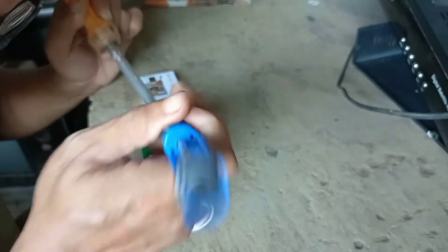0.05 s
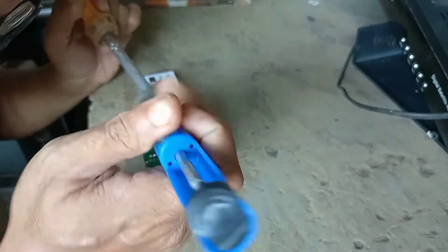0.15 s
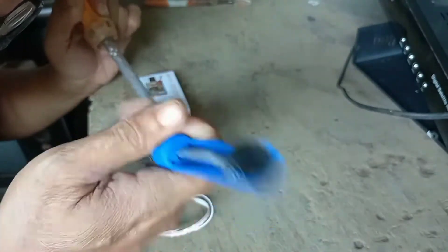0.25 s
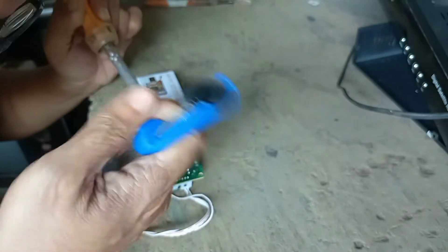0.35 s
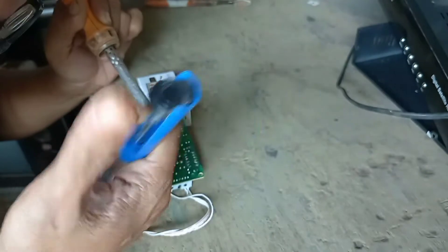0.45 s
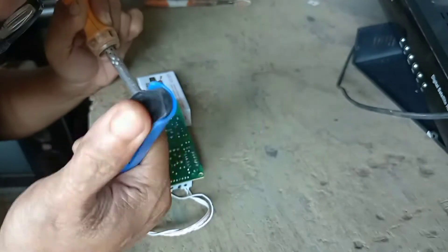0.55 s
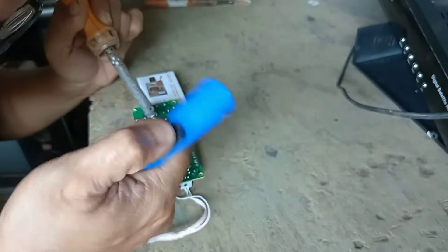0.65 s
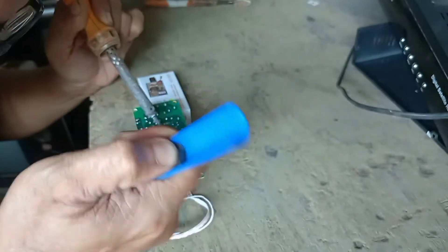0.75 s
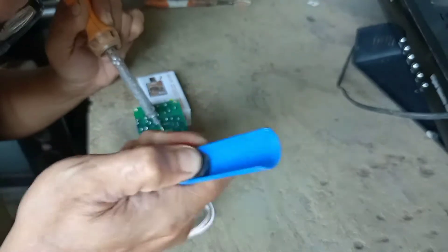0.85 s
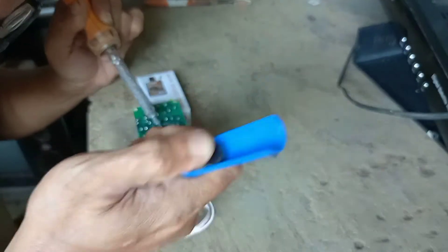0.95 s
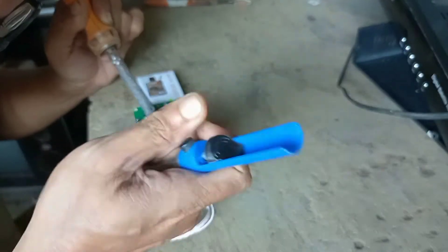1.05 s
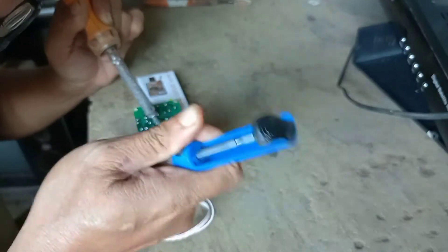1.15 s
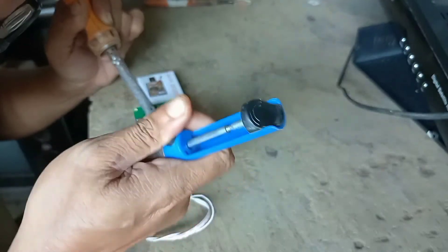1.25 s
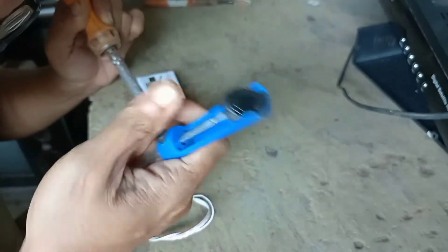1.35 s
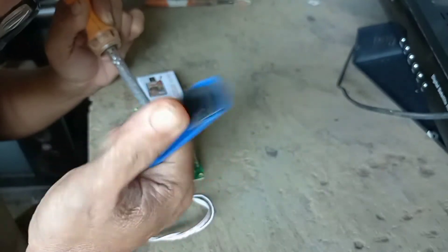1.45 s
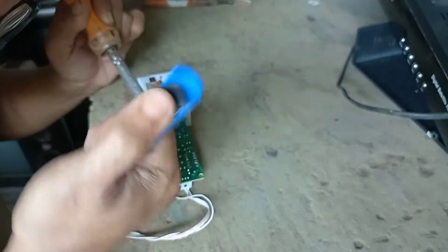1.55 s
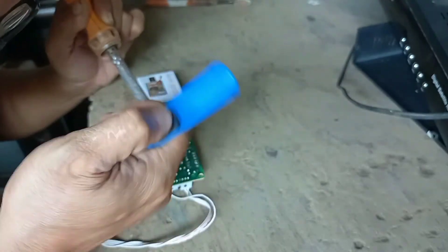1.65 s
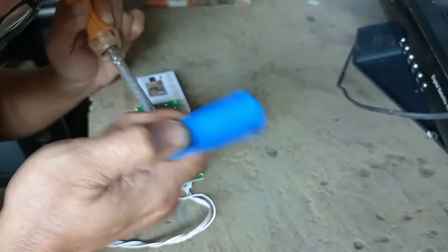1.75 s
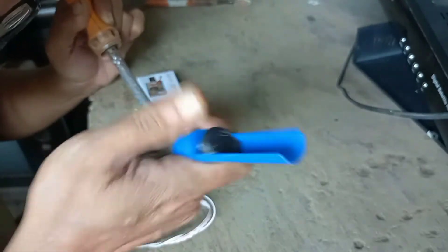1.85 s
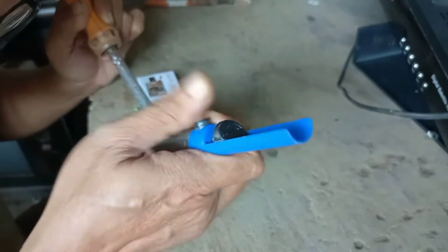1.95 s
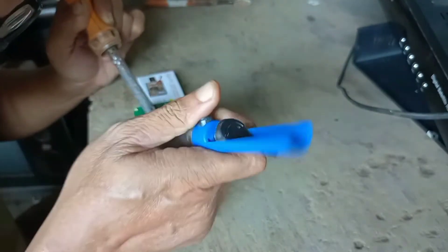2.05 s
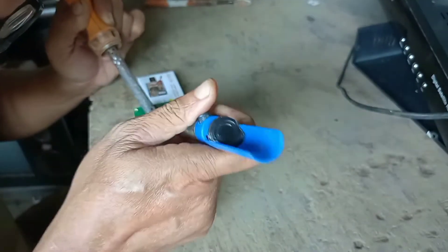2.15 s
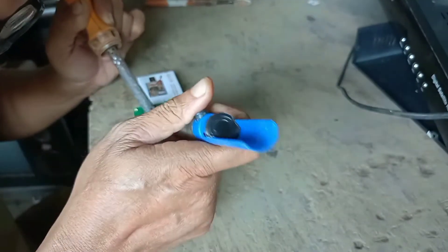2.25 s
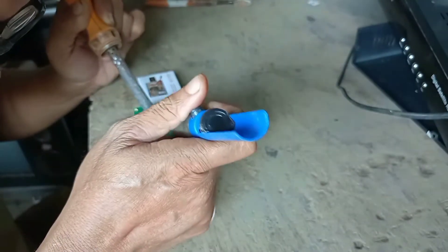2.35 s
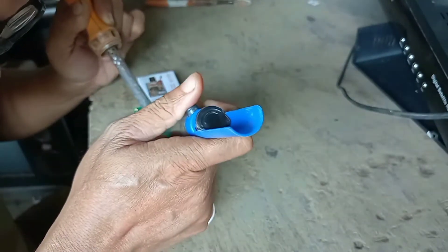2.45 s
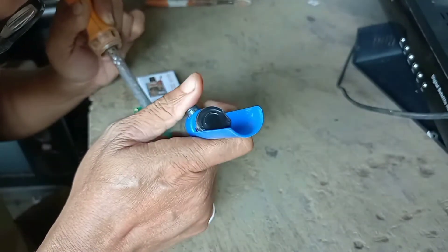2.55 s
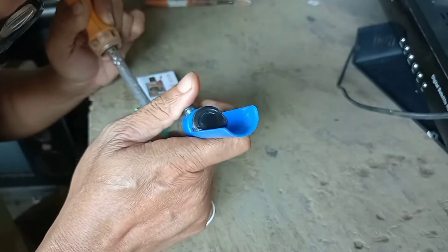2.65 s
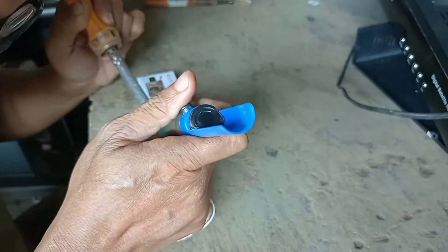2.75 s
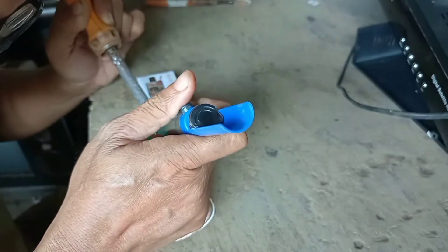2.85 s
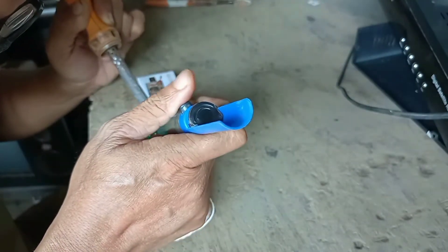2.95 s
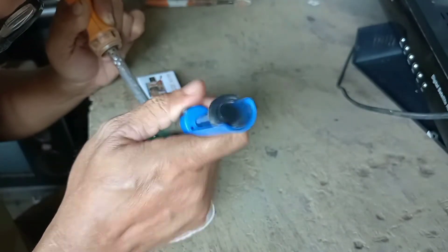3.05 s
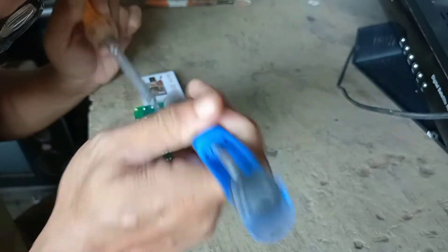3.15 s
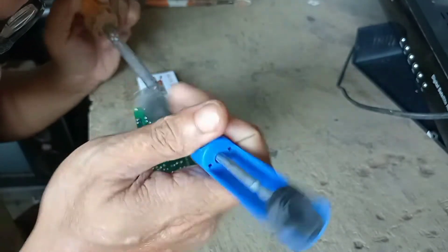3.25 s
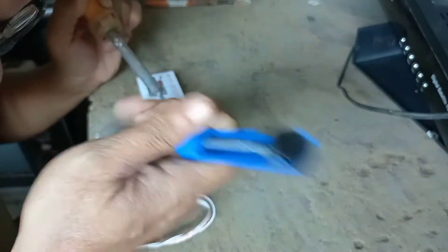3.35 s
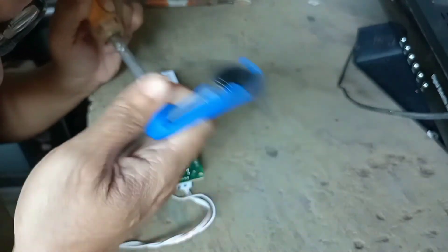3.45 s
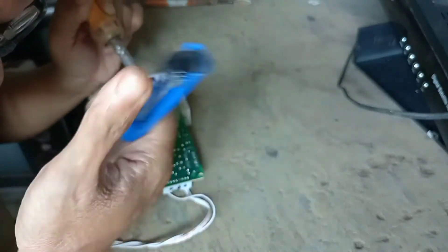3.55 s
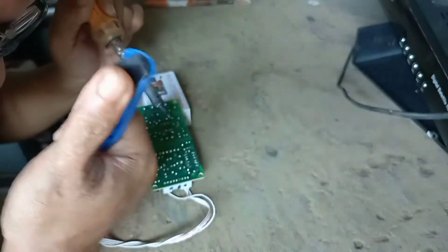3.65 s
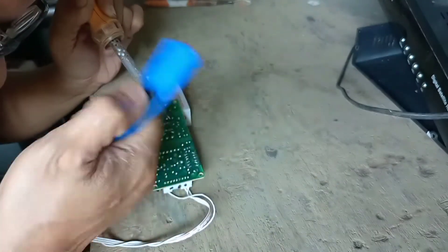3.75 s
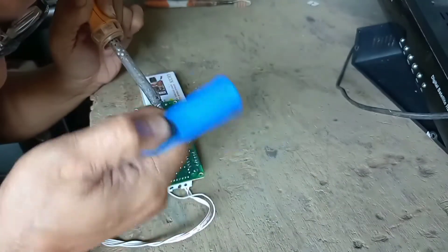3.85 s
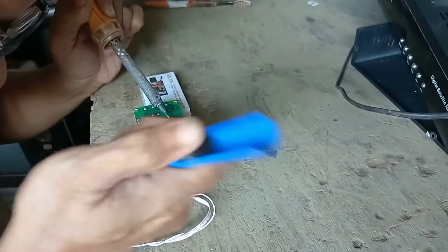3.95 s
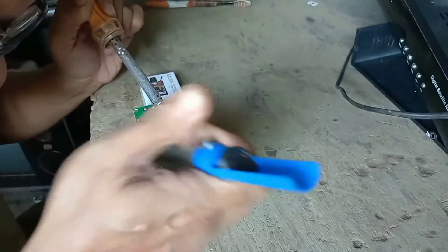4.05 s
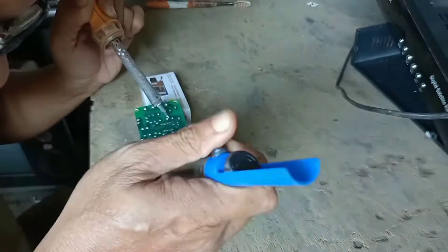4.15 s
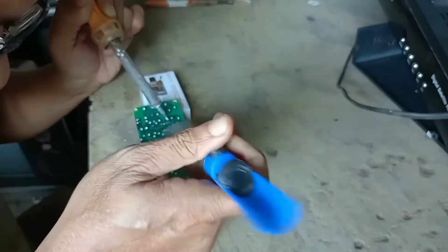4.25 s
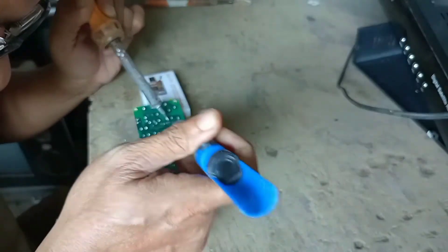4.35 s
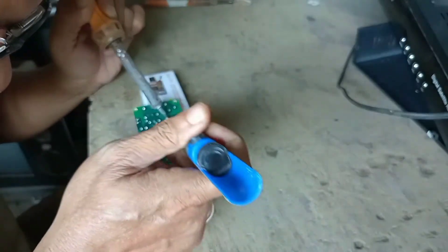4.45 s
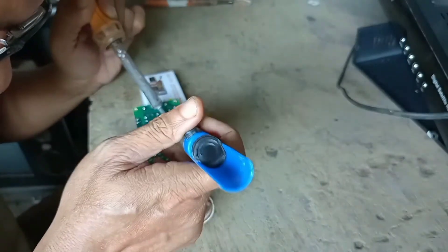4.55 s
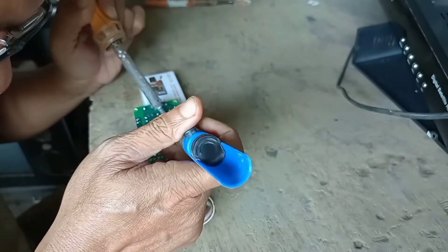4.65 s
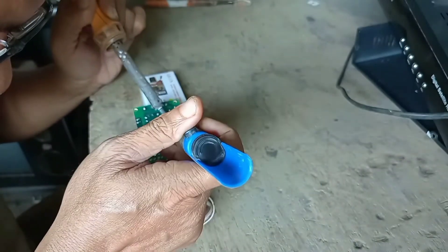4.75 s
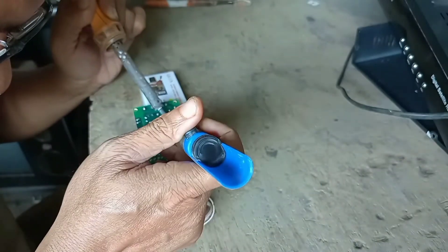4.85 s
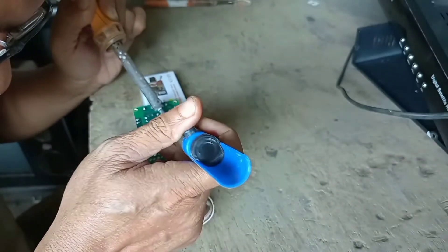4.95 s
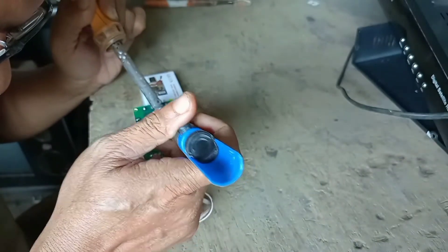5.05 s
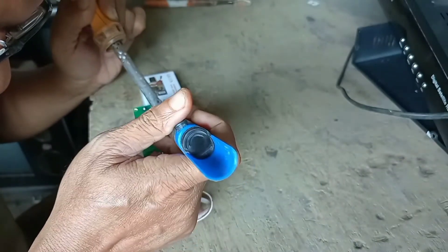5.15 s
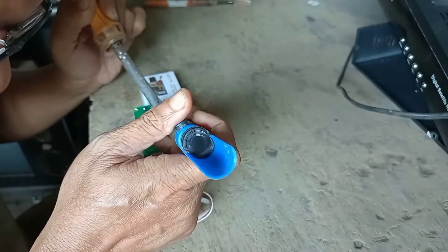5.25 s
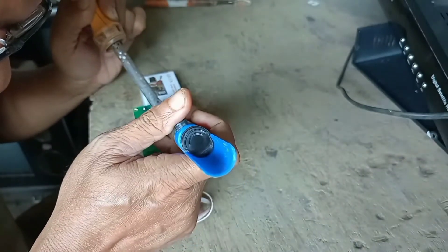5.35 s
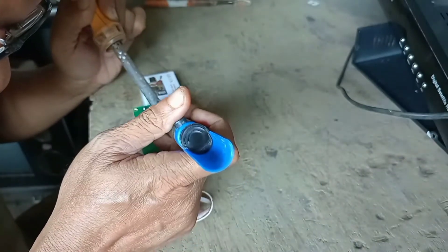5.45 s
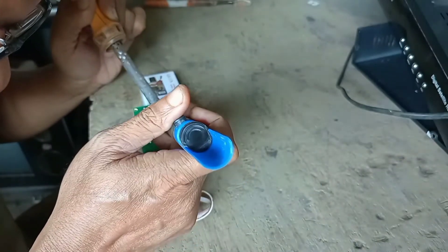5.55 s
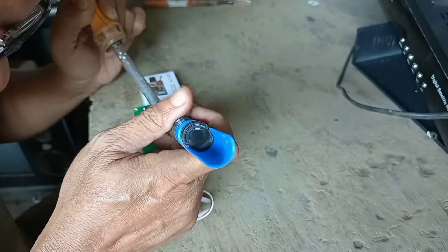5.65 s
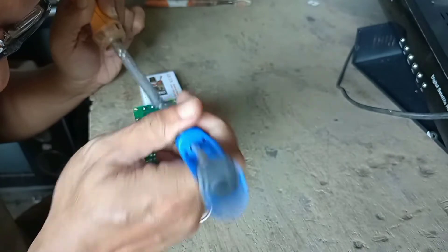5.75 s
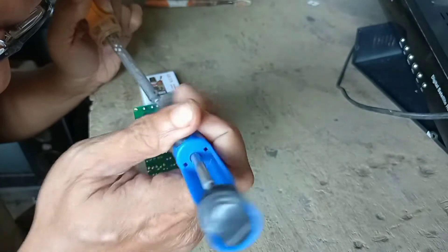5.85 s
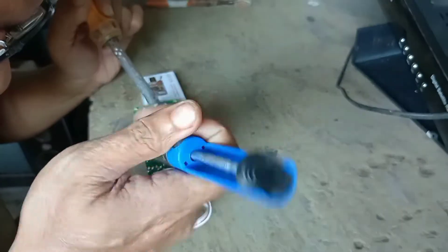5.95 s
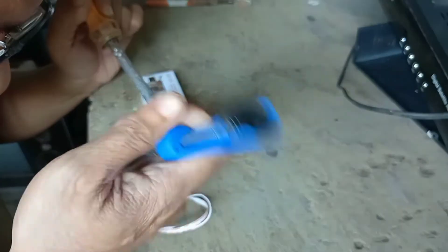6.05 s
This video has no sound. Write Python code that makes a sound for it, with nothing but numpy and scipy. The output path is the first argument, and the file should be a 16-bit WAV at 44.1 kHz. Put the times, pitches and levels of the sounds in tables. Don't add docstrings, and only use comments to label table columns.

```python
import sys
import numpy as np
from scipy import signal
from scipy.fft import rfft, irfft
from scipy.io import wavfile
from scipy.ndimage import uniform_filter1d

SR = 44100
rng = np.random.default_rng(int(sys.argv[2]) if len(sys.argv) > 2 else 0)


def magnitude_from_level(level_db):
    exponent = np.asarray(level_db, float) / 20
    return 10 ** exponent


def wav_out(sig):
    wavfile.write(sys.argv[1], SR, np.round(np.clip(np.atleast_2d(sig).T, -1, 1) * 32767).astype(np.int16))


N = 269451
T = np.arange(N) / SR

# (time [s], peak [dB], limiter dip [dB], air [dB], barrel ring [dB])
RELEASES = [
    (0.0215, -4, 10.5, -32, 0),
    (1.1733, -3.5, 13, -32, 0.5),
    (3.0720, -5, 12.5, -27, 1),
    (5.7270, -6, 14.5, -31.5, -2),
]
# (thumb push [s], latch catch [s], latch peak [dB], barrel ring [dB])
COCKS = [
    (0.595, .69, -4.5, 1.5),
    (1.572, 1.6589, -4, 2),
    (3.711, 3.7926, -2.5, -0.5),
]
# (pop time [s], pop peak [dB], air jet [dB])
SEATS = [
    (0.9822, -11.5, -26),
    (1.8396, -9.5, -27),
    (3.9853, -12, -21.5),
]
# (pitch [Hz], width [Hz], level [dB])
LATCH_MODES = [(3340, 750, 1), (4840, 530, -5.5), (5370, 390, -12), (7000, 290, -3), (9300, 1600, -3.5),
               (14800, 900, -14)]

TRAVEL_S = .0127
LATCH_EDGE_HZ = 2750
PORT_LAG_S = .00015


def unit(x):
    return x / np.sqrt(np.mean(x ** 2))


def on_log(table, hz):
    point_hz, value = np.transpose(table)
    return np.interp(np.log(hz + 1), np.log(point_hz + 1), value)


def colour(x, table):
    size = x.shape[-1]
    gain = magnitude_from_level(on_log(table, np.fft.rfftfreq(size, 1 / SR)))
    return irfft(rfft(x) * gain, size)


def band(x, lo_hz, hi_hz):
    edges_hz = [lo_hz, min(hi_hz, .45 * SR)]
    return signal.sosfilt(signal.butter(2, edges_hz, "band", fs=SR, output="sos"), x)


def ring(x, modes):
    out = 0
    for k, (hz, width_hz, db) in enumerate(modes):
        b, a = signal.iirpeak(hz, hz / width_hz, SR)
        out = out + (-1) ** k * magnitude_from_level(db) * signal.lfilter(b, a, x)
    return out


def walk(rate_hz):
    hold = int(SR / rate_hz)
    steps = np.repeat(rng.standard_normal(N // hold + 1), hold)
    return unit(uniform_filter1d(uniform_filter1d(steps, hold), hold)[:N])


def late_right(x):
    return np.array([x, np.roll(x, round(PORT_LAG_S * SR))])


def ports(size, share):
    both, own = rng.standard_normal(size), rng.standard_normal((2, size))
    share = np.clip(share, 0, 1)
    return np.sqrt(share) * late_right(both) + np.sqrt(1 - share) * own


def add(track, s, x, pan_db):
    i = int(s * SR)
    gain = magnitude_from_level(np.array([[pan_db], [-pan_db]]) / 2)
    track[:, i:i + x.shape[1]] += (x * gain)[:, :N - i]


def contact(envelope):
    x = ports(len(envelope), 0.54)
    for _ in range(4):
        spectrum = rfft(x * envelope)
        x = irfft(spectrum / np.abs(spectrum), len(envelope)) / (envelope + .05)
    return x * envelope


def cracks(events, modes, blow_s, rattle_db, rattle_s, edge_hz, body_db):
    out, t = np.zeros((2, N)), T[:2048]
    for s, db, pan_db, barrel_db in events:
        blow = t / blow_s * np.exp(1 - t / blow_s)
        rattle = magnitude_from_level(rattle_db + 2.2 * walk(1500)[:len(t)]) * np.exp(-t / rattle_s)
        push = contact(blow + rattle)
        gripped = [(hz, width_hz, g + barrel_db * (2600 < hz < 3900)) for hz, width_hz, g in modes]
        edge = signal.butter(6, edge_hz, "high", fs=SR, output="sos")
        x = signal.sosfilt(edge, ring(push, gripped)) + magnitude_from_level(body_db) * band(push, 710, 1600)
        add(out, s, magnitude_from_level(db + 18.0) * x / np.linalg.norm(x), pan_db)
    return out


def stop_cracks():
    # (pitch [Hz], width [Hz], level [dB])
    stop_modes = [(833, 270, -6), (1880, 1300, -2), (3067, 1100, 0), (4900, 980, -6.5), (7400, 2500, -5),
                  (9700, 2700, -1), (11700, 3300, -4), (14200, 3200, -10.5)]
    events = [(s, db, 1, barrel_db) for s, db, _, _, barrel_db in RELEASES]
    return cracks(events, stop_modes, blow_s=.0004, rattle_db=-21.0, rattle_s=0.0047,
                  edge_hz=450, body_db=-28)


def latch_cracks():
    events = [(s, db, 2.5, barrel_db) for _, s, db, barrel_db in COCKS]
    return cracks(events, LATCH_MODES, blow_s=0.00011, rattle_db=-18.0, rattle_s=0.014,
                  edge_hz=LATCH_EDGE_HZ, body_db=-22.5)


def ticks():
    # (time [s], peak [dB], barrel ring [dB])
    tick_events = [(.0100, -16, 2.5), (.6595, -33, 4.5), (.7373, -30.5, -0.5), (.7530, -19.5, -6),
                   (.9745, -24.5, -7), (0.9813, -25.5, 0), (1.1650, -9.5, 1.5), (1.8145, -28.5, -11.5),
                   (1.8345, -19.5, -10), (1.8394, -21.5, -9), (3.9599, -36, -1.5), (3.9656, -24.5, -8.5),
                   (3.9850, -21.5, 5), (5.7160, -15, 4)]
    events = [(s, db, 2, barrel_db) for s, db, barrel_db in tick_events]
    return cracks(events, LATCH_MODES, blow_s=0.000093, rattle_db=-11.0, rattle_s=.002,
                  edge_hz=LATCH_EDGE_HZ, body_db=-23)


def pops():
    # (time [s], peak [dB], pitch [Hz])
    release_pops = [(.0135, -12, 640), (1.1640, -25, 500), (1.173, -20, 450), (3.060, -18, 190),
                    (3.0645, -12, 750), (5.7155, -18, 170), (5.7275, -18, 380)]
    out, t = np.zeros((2, N)), T[:2048]
    events = [(s, db, hz, 1.3) for s, db, hz in release_pops]
    events += [(s, db, 663, 0.92) for s, db, _ in SEATS]
    for s, db, hz, cycles in events:
        phase = 2 * np.pi * hz * t / (1 + 0.28 * t * hz / cycles ** 2)
        wave = np.sin(phase) + .12 * np.sin(2 * phase) - .15 * np.sin(3 * phase)
        add(out, s, magnitude_from_level(db) * late_right(wave * np.exp(-(t * hz / cycles) ** 4)), 2.8)
    return out


def strokes():
    slide_db, swell_db, stops_s = -48.5, 7, 0.0098
    leak_s, leak_db, jet_s, jet_bass_db = 0.018, -28, .007, -11.5
    rows = [(push_s, latch_s - stops_s, slide_db, slide_db + swell_db, -8.5) for push_s, latch_s, *_ in COCKS]
    for s, _, db in SEATS:
        rows.append((s - jet_s - leak_s, s - jet_s, db + leak_db, db + leak_db / 3, jet_bass_db))
        rows.append((s - jet_s, s, db, db, jet_bass_db))
    return rows + [(s - TRAVEL_S, s, db, db - 1.5, -0.5) for s, _, _, db, _ in RELEASES]


def rushes():
    # (pitch [Hz], level [dB per Hz])
    air_spectrum = [(880, -32.5), (1500, -10), (2380, -15), (2970, -6), (4660, -6.5), (5530, -13.5),
                    (6960, -7.5), (9040, -4.5), (15100, -16), (16500, -28.5)]
    hiss = unit(colour(ports(N, 0.25), air_spectrum)) * magnitude_from_level(2.1 * walk(400))
    buffet = unit(band(ports(N, 0.9), 250, 1300))
    out = np.zeros((2, N))
    for start_s, end_s, start_db, end_db, bass_db in strokes():
        length_s = end_s - start_s
        t = T[:int((length_s + .03) * SR)]
        gate = np.minimum(t / 0.00061, 1) * np.exp(-np.maximum(t - length_s, 0) / 0.0029)
        level = magnitude_from_level(np.interp(t, [0, length_s], [start_db, end_db]))
        i = slice(int(start_s * SR), int(start_s * SR) + len(t))
        add(out, start_s, gate * level * (hiss[:, i] + magnitude_from_level(bass_db) * buffet[:, i]), 1.8)
    return out


def creaks():
    # (time after push [s], length [s], pitch [Hz], width [Hz], level [dB])
    stroke_creaks = [
        (-.006, .018, 1700, 243.2, -46),
        (.006, 0.013, 1390, 221.1, -52.5),
        (.033, .04, 850, 250, -53.5),
    ]
    # (time [s], length [s], pitch [Hz], width [Hz], level [dB])
    grip_creaks = [
        (1.158, .015, 2991, 300, -22.5),
        (1.704, 0.029, 530, 204, -48),
    ]
    out = np.zeros((2, N))
    events = list(grip_creaks) + [(c[0] + k[0], *k[1:]) for c in COCKS for k in stroke_creaks]
    for s, length_s, hz, width_hz, db in events:
        size = int(length_s * SR)
        rub = ports(size, 0.3) * np.hanning(size)
        x = ring(ring(rub, [(hz, width_hz, 0)]), [(hz, 2 * width_hz, 0)])
        add(out, s, magnitude_from_level(db) * unit(x), 1.5)
    return out


def limiter():
    recover_db_per_s = 156.5
    dips = [(r[0], r[2]) for r in RELEASES]
    dips += [(r[0] - TRAVEL_S, 7.5) for r in RELEASES]
    dips += [(c[1], 3.5) for c in COCKS]
    dips += [(s[0], -2.5) for s in SEATS]
    db = np.max([np.clip(dip_db - recover_db_per_s * (T - s), 0, 40) * (T > s - .002)
                 for s, dip_db in dips], axis=0)
    return magnitude_from_level(-uniform_filter1d(db, size=64))


def room(dry):
    # (pitch [Hz], level [dB], t60 [s])
    decays = [(300, 5, 0.28), (724, 3, 0.22), (1510, -1, 0.31), (2800, 0, 0.27), (5430, -5, 0.39),
              (10300, 1, 0.31), (14000, -2, 0.087)]
    room_db, first_wall_s = -12, 0.014
    t = T[:int(SR / 2)]
    tail = 0
    for hz, db, t60_s in decays:
        tail = tail + magnitude_from_level(db - 60 * t / t60_s) * band(ports(len(t), .25), hz / 1.5, hz * 1.84)
    tail = tail * (magnitude_from_level(5) + np.clip((t - first_wall_s) / 0.0014, 0, 1))
    tail = tail / np.sqrt(np.sum(tail ** 2) / 2)
    return signal.fftconvolve(dry, tail, axes=1)[:, :N] * magnitude_from_level(room_db)


def nearness():
    # (time [s], level [dB])
    distance_levels = [(0, 0.5), (1.2, -1.5), (2.0, -3), (2.4, -16), (3.0, -19), (3.8, -15), (4.4, -7.5),
                       (4.9, -4), (5.6, -6.5), (6.11, -3)]
    return np.interp(T, *np.transpose(distance_levels))


def motor(hz, db, wobble, flicker_db):
    phase = np.cumsum(2 * np.pi * hz * (1 + wobble * walk(9)) / SR)
    return np.sqrt(2) * np.sin(phase) * magnitude_from_level(db + flicker_db * np.tanh(walk(7)))


def motors():
    # (pitch [Hz], level [dB], share of nearness [0-1], wobble [ratio], flicker [dB])
    engine_tones = [(67.8, -42, 0.99, .007, 3), (98.8, -51, 0.89, .025, 3.5), (120.6, -47.5, 1, 0.012, 3),
                    (144.2, -48, .4, .02, 3.5)]
    # (time [s], pitch [Hz], level [dB])
    drone = [(0, 169.6, -60), (2.0, 166.2, -54), (3.2, 165.2, -51), (4.1, 174, -47.5), (5.3, 181.3, -47),
             (5.7, 178, -52), (6.11, 176.1, -47)]
    engine = sum(motor(hz, db + share * nearness(), wobble, flicker_db)
                 for hz, db, share, wobble, flicker_db in engine_tones)
    s, hz, db = np.transpose(drone)
    return engine + motor(np.interp(T, s, hz), np.interp(T, s, db), .015, 1.5)


def street():
    # (pitch [Hz], level [dB per Hz])
    street_spectrum = [(15, -61.5), (25, -13), (58, -12), (92, -13), (172, -7.5), (202, -14), (296, -14.5),
                       (399, -28.5), (787, -33), (2900, -48.5), (3700, -48.5), (5420, -60.5),
                       (13300, -53.5), (15200, -63), (16500, -79.5)]
    # (pitch [Hz], likeness of the ports [0-1])
    likeness = [(60, 0.2), (130, 0.89), (290, 0.7), (640, 0), (1410, 0), (3100, 0.01), (6820, 0.5),
                (15000, 0.41)]
    hiss_db, pass_s, pass_length_s, pass_db = -61, 1.2, .35, 11.5
    hz = np.fft.rfftfreq(N, 1 / SR)
    alike = np.clip(on_log(likeness, hz), -1, 1)
    level = magnitude_from_level(on_log(street_spectrum, hz))
    mid, side = (rfft(rng.standard_normal(N)) * np.sqrt(1 + k * alike) * level for k in (1, -1))
    left_right = np.array([mid + side, mid - side])

    bass_db, rumble_db = 3.9 + 0.22 * nearness(), 0.27 + .1 * nearness()
    passing_db = pass_db * np.exp(-((T - pass_s) / pass_length_s) ** 4)
    swells_db = (bass_db, bass_db, rumble_db, rumble_db, (rumble_db + passing_db) / 2, passing_db)
    flickers_db = (3.6, 1.2, 1.3, 5.3, 1.1, 0.33)

    centres_hz = 50 * 2. ** np.arange(6)
    shares = np.array([np.exp(-np.log2((hz + 1) / c) ** 2 * 2) for c in centres_hz]) + 1e-30
    shares[-1] = np.where(hz > 1600, 1, shares[-1])
    shares = shares / shares.sum(axis=0)
    out = sum(irfft(left_right * share, N) * magnitude_from_level(swell_db + flicker_db * walk(11))
              for share, swell_db, flicker_db in zip(shares, swells_db, flickers_db))
    return out / band(out, 890, 23000).std() * magnitude_from_level(hiss_db)


def toots():
    # (start [s], end [s], pitch [Hz], level [dB])
    far_tones = [(.40, .60, 3730, -70), (.81, .98, 485, -57), (.85, .99, 1950, -64), (.86, .97, 2500, -58),
                 (1.0, 1.08, 1840, -72), (1.06, 1.17, 931, -57), (1.11, 1.16, 2170, -64),
                 (1.3, 1.5, 2300, -66), (2.65, 2.79, 3740, -78), (2.76, 2.92, 3570, -77),
                 (2.91, 3.07, 710, -58), (4.15, 4.25, 2820, -81), (5.34, 5.65, 2790, -76)]
    out = np.zeros((2, N))
    for start_s, end_s, hz, db in far_tones:
        size = int((end_s - start_s) * SR)
        pitch_hz = hz * np.linspace(1.006, .994, size) + (6 + hz / 200) * walk(60)[:size]
        port_phase = np.array([[0], [1.3]])
        tone = np.sin(np.cumsum(2 * np.pi / SR * pitch_hz) + port_phase)
        level = magnitude_from_level(db + 6 + 2.5 * walk(50)[:size])
        add(out, start_s, tone * level * np.hanning(size) ** .6, 1.5)
    return out


def scene():
    hits = stop_cracks() + latch_cracks() + ticks() + pops() + creaks()
    air, gain = rushes(), limiter()
    echo = room((hits + air) / gain)
    steady = air + gain * (echo + street() + motors() + toots())
    lowpass = signal.ellip(8, .2, 60, 15900, fs=SR, output="sos")
    return hits + signal.sosfilt(lowpass, steady)


def low_pass(x):
    return signal.sosfilt(signal.butter(12, 16960, fs=SR, output="sos"), x)


def record(dry):
    x = signal.sosfilt(signal.butter(3, 38, "high", fs=SR, output="sos"), dry)
    mid, side = (x[0] + x[1]) / 2, (x[0] - x[1]) / 2
    side = colour(side, [(100, -5), (2500, 0.5), (5000, 1.5), (8000, -7.5), (14000, -11.0)])
    return low_pass(np.clip([mid + side, mid - side], -1, 1))


dry = scene()
out = record(dry)
wav_out(out)
```